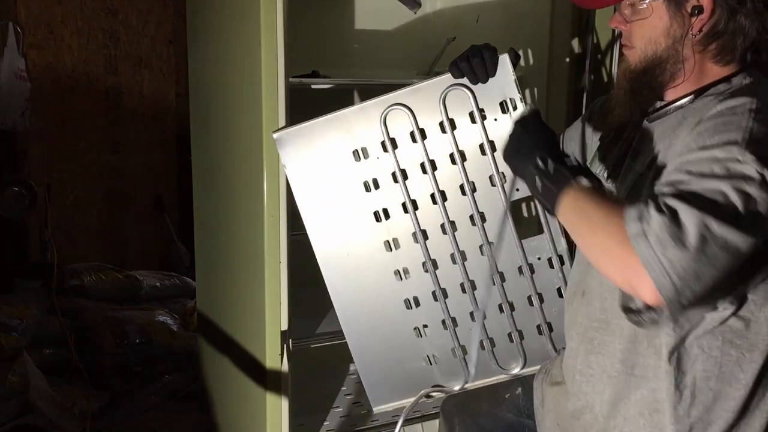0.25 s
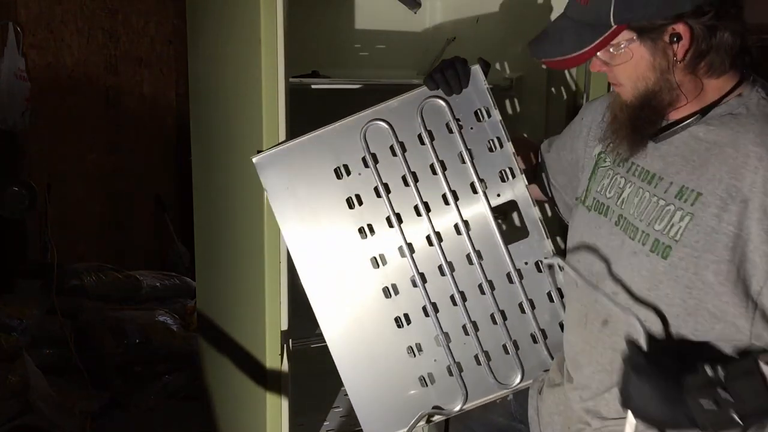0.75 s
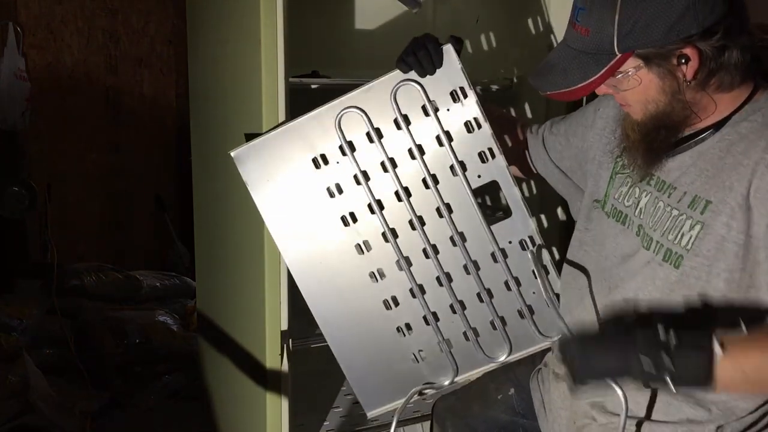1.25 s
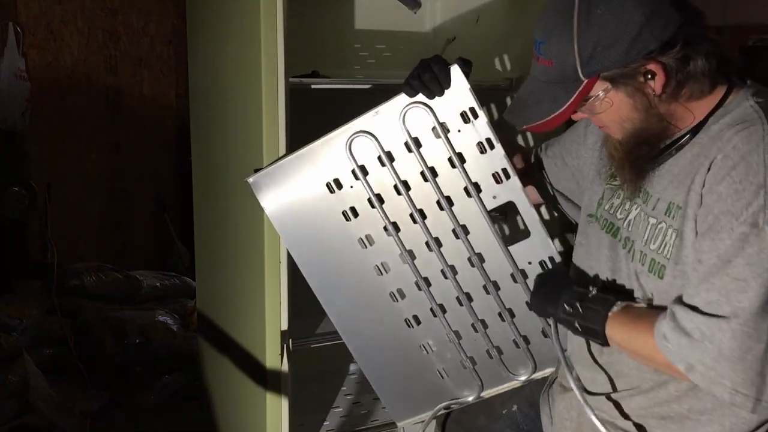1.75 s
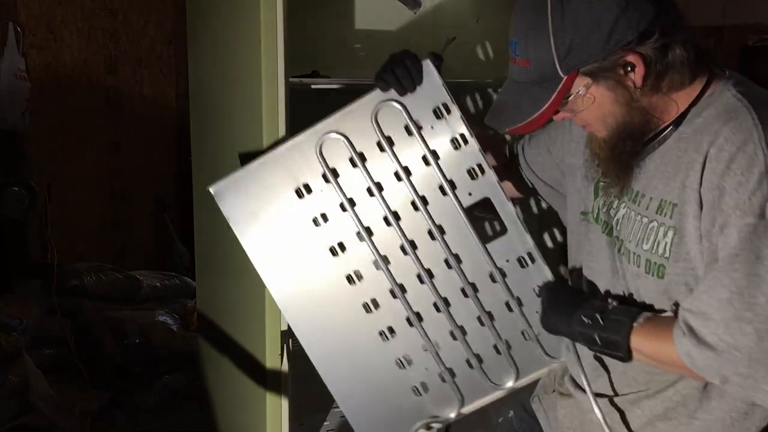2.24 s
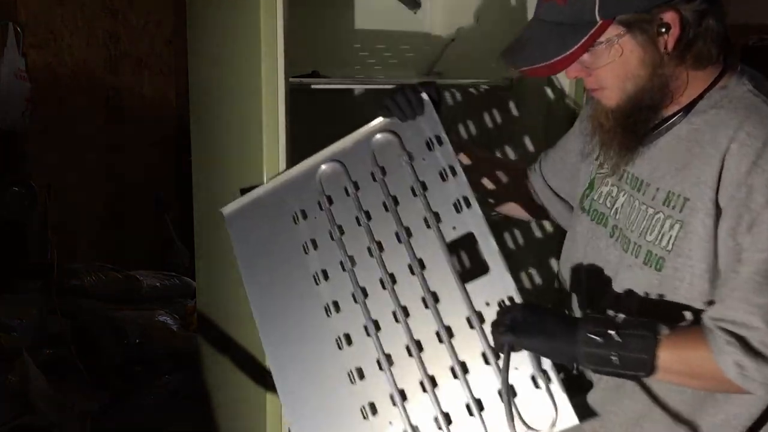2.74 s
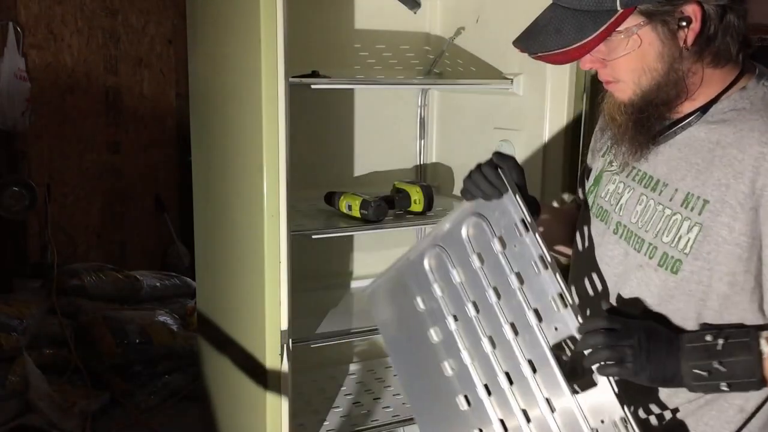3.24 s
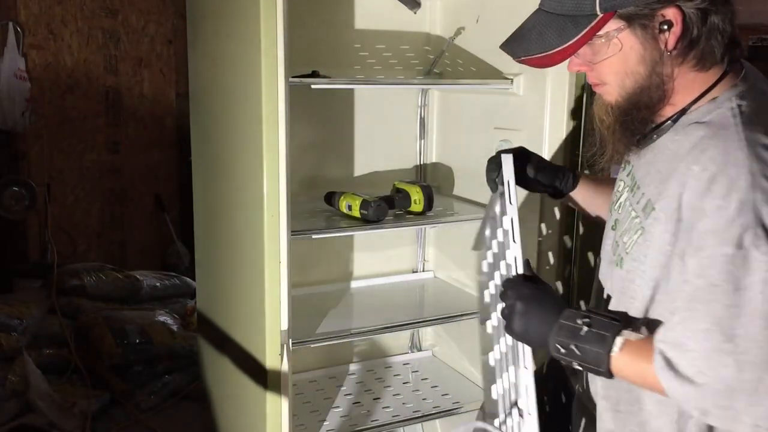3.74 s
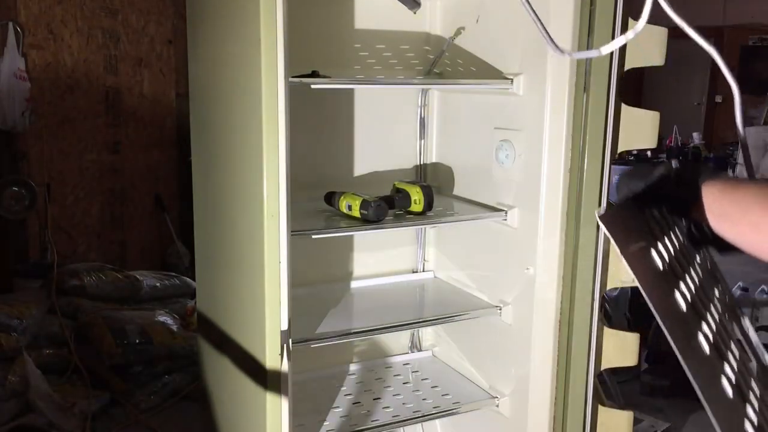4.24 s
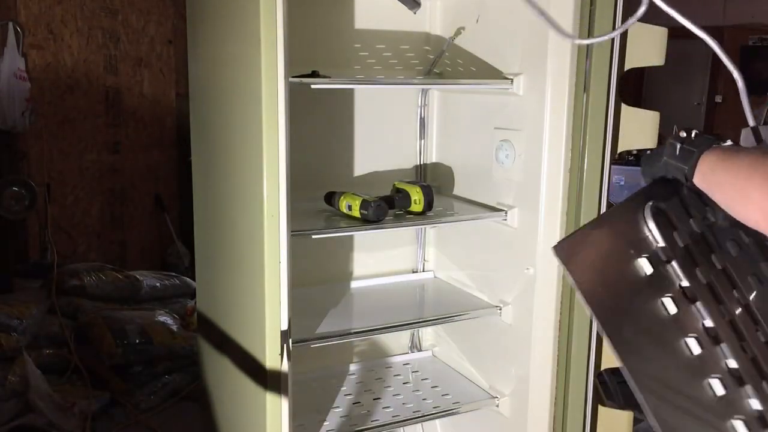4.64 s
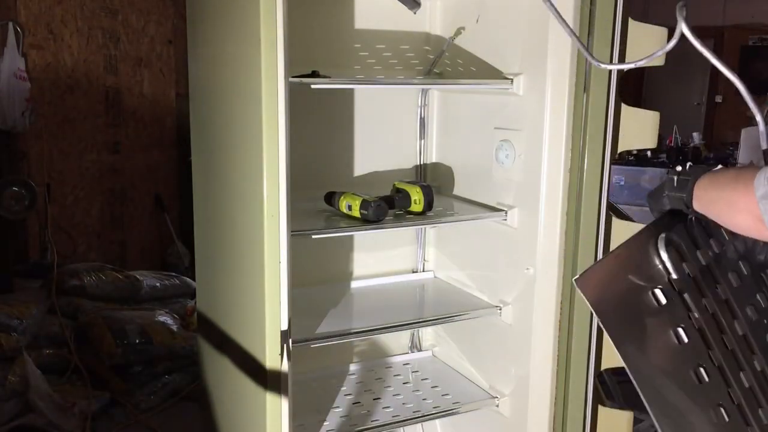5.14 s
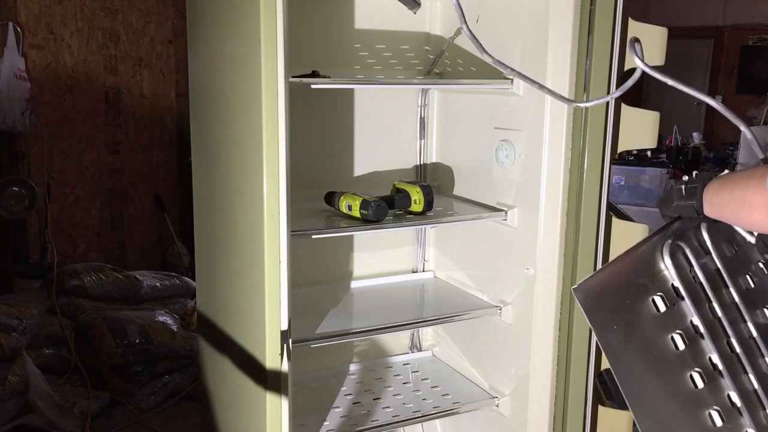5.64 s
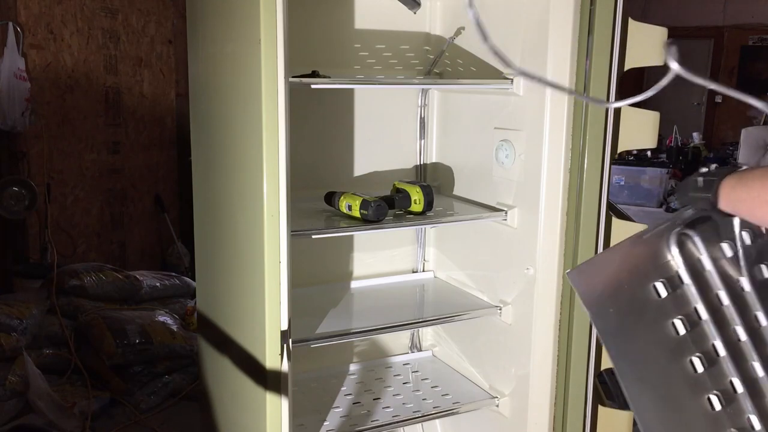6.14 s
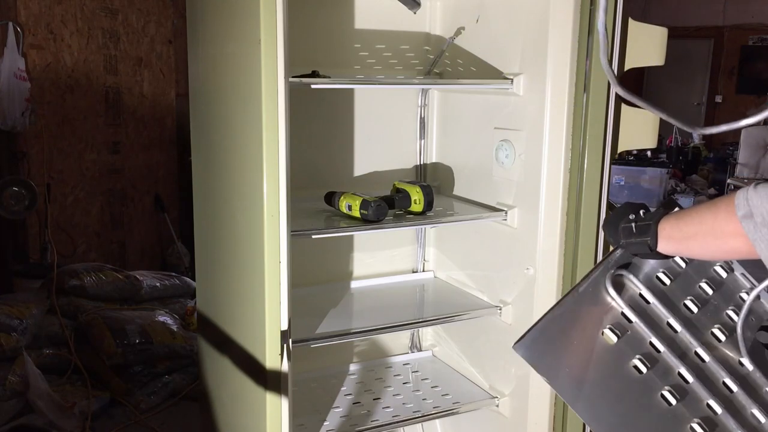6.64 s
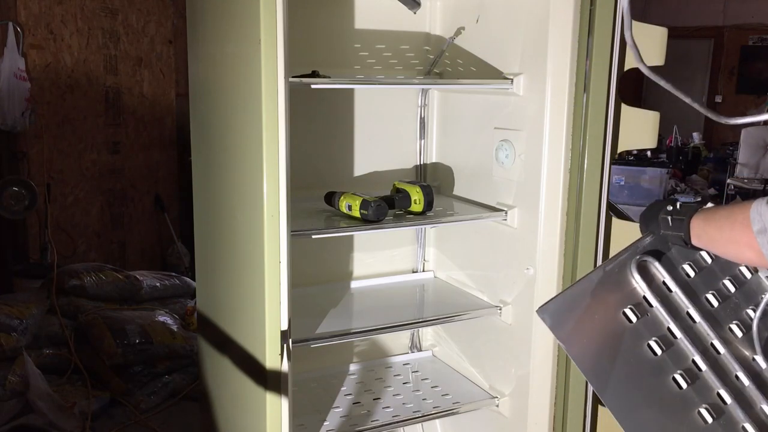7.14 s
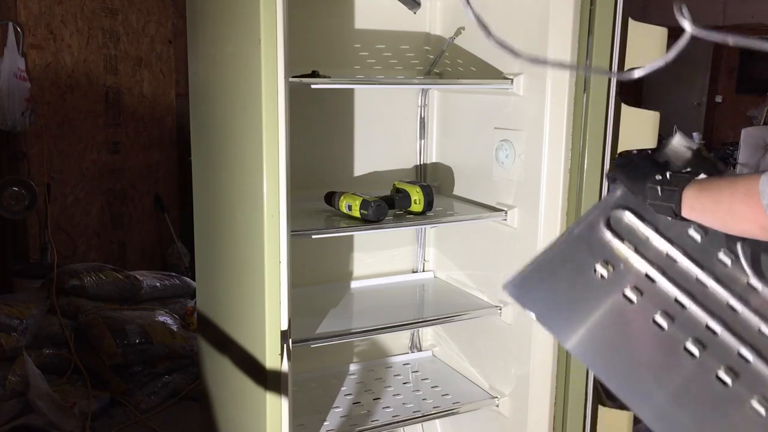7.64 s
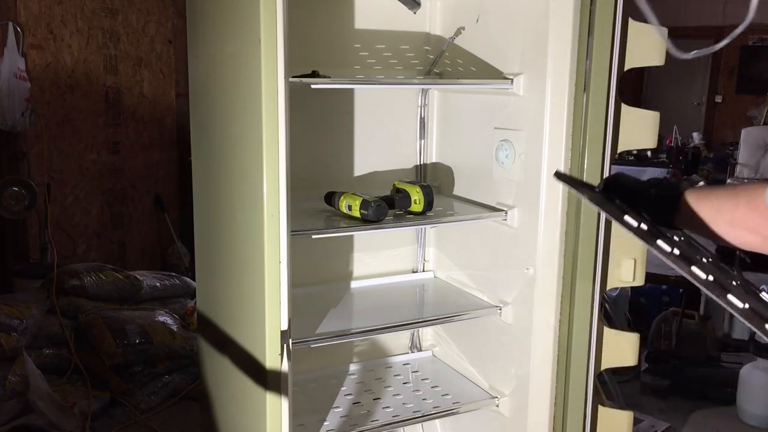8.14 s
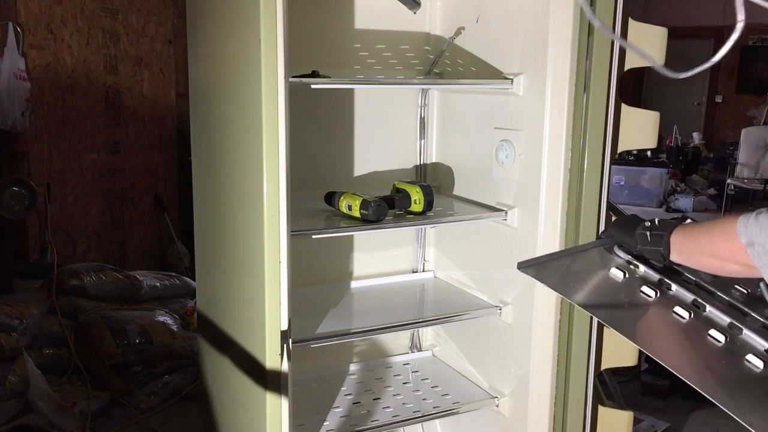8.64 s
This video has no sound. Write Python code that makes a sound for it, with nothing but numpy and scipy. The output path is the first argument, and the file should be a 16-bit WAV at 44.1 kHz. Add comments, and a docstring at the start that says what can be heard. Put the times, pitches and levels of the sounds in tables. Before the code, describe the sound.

Close, single-microphone sound in a small reverberant workshop with a low murmur. A short rub of glove and tube on thin perforated sheet metal leads to a clattering release at 0.25-0.55 s, loudest near 0.5 s, with hollow booming, tinny ringing and a high tube ping. Scraping continues, with a knock at 0.88 s, a soft dull touch near 1.25, and clanks at 1.7 and 2.0. Two hard, bright cracks ring the sheet at 2.68 and 2.97 s. It then quiets to faint rustles and ticks. At about 3.9 s a steady, airy mid-range hum switches on and stays. Gritty glove strokes and light taps follow around 4.2-4.7, a double clunk at 5.36, a cluster of hollow knocks at 6.25-6.33 and another at 6.6. Hissing rubs around 7-8 s precede softer knocks at 8.13 and 8.83.

```python
"""A short rub of glove and tube over a thin perforated sheet comes first, above a low room murmur.
Then, in a small workshop, gloved hands pull the metal tube out of the sheet's clips: each clip lets go
with a snap or knock, a noise burst that rings the sheet's modes. Grainy noise makes the sliding between
them, and filtered noise the murmur and a steady airy hum that sets in partway. One microphone channel
takes the near sound, the workshop's reverberation and the background."""
import sys
import numpy as np
from scipy import signal
from scipy.fft import rfft, irfft
from scipy.io import wavfile

SR = 44100
rng = np.random.default_rng(int(sys.argv[2]) if len(sys.argv) > 2 else 0)


def bounce(signal):
    """Save signal as a 16-bit WAV file at the path given by the first command-line argument."""
    frames = np.transpose(np.atleast_2d(signal))
    limited = np.clip(frames, -1, 1)
    pcm = np.round(limited * 32767).astype(np.int16)
    wavfile.write(sys.argv[1], SR, pcm)


def invert_db(x):
    """Field ratio 10**(x/20) for x, a level in decibels (scalar or array-like)."""
    u = np.asarray(x, float) / 20
    return 10 ** u


N = 391608

# spectrum of the room murmur: pitch_hz, relative level_db per Hz
MURMUR_SPECTRUM = [(24, -49), (40, -8), (140, 4.5), (312, -3.5), (467, -4.5), (873, -9.5), (1040, -6.5),
                   (2380, -14.5), (4930, -16.5), (12800, -20), (16000, -25)]
MURMUR_DB = -69.5
# spectrum of the airy hum: pitch_hz, relative level_db per Hz
HUM_SPECTRUM = [(300, -24), (500, -7.5), (800, 0.5), (1000, 3), (1450, -3.5), (1900, -17), (3000, -39)]
# level of the airy hum over time: time_s, level_db
HUM_LEVEL = [(0, -95.5), (3.9, -91), (3.93, -71), (6.2, -69), (8.88, -75)]
# workshop reverberation: pitch_hz, level_db, t60_s
ROOM = [(115.5, -5.5, .6), (360, -9.5, 0.63), (950, -9.5, 0.082), (2160, -14, 0.64), (4100, -12, 0.83),
        (7900, -10.5, 0.68), (16000, -14.5, 0.71)]
# edges of the third-octave bands that store dense ringing: pitch_hz
BAND_EDGES = 60 * 2 ** np.arange(0, 8.4, 1 / 3)
# spectrum of the glove's hiss: pitch_hz, relative level_db per Hz
GLOVE_SPECTRUM = [(300, -31.5), (1500, -3), (3000, 1), (5000, 3.5), (9000, 0.5), (13000, 1), (16000, -7.5)]
# strokes of glove and tube over the sheet: start_s, length_s, hiss_db, relative drag_db
STROKES = [(0, 0.067, -75.5, -70.5), (0.13, 0.013, -70.5, -64), (0.25, 0.72, -65, -56.5),
           (1.184, 0.093, -71.5, -58), (1.288, 0.059, -61.5, -64.5), (1.41, 0.02, -64, -65),
           (1.512, 0.042, -65.5, -63), (1.666, .02, -69, -67), (1.721, 0.19, -70, -63),
           (2.177, 0.094, -79.5, -61), (2.31, 0.12, -65.5, -59.5), (2.47, 0.14, -69, -65.5),
           (3.476, 0.061, -69.5, -75), (3.563, 0.045, -85, -64), (3.656, 0.051, -75.5, -73.5),
           (3.784, 0.091, -72.5, -82), (3.947, 0.029, -64.5, -67), (4.055, 0.014, -68.5, -76),
           (4.132, 0.01, -64.5, -59.5), (4.202, 0.086, -63.5, -57.5), (4.541, .11, -62, -65),
           (4.68, 0.12, -59.5, -64.5), (4.907, 0.071, -67, -62), (5.099, 0.11, -76.5, -79),
           (5.26, 0.11, -83.5, -69.5), (6.19, 0.081, -75.5, -66.5), (6.954, 0.06, -57.5, -60.5),
           (7.097, 0.046, -64, -69), (7.409, 0.046, -65, -73), (7.519, 0.022, -56, -59),
           (7.592, 0.14, -59.5, -56), (7.811, 0.058, -55, -61), (7.94, .04, -65.5, -62.5),
           (8.05, 0.046, -66.5, -63), (8.12, 0.083, -63, -57), (8.33, 0.15, -69, -79),
           (8.526, .13, -73.5, -69.5), (8.708, 0.018, -75, -63.5), (8.72, 0.043, -92, -58.5)]
STROKE_RISE_DB_PER_S, STROKE_FALL_DB_PER_S, STROKE_FLUTTER_DB = 600, 300.5, 0.5
# the tube strains against a clip until it lets go: release_s, hiss_db, relative drag_db
STRAINS = [(.255, -63, -50.5), (0.871, -70, -58), (1.985, -61.5, -48.5), (2.674, -67, -52.5),
           (5.355, -75, -59.5), (6.612, -60.5, -48.5), (8.123, -54.5, -63), (8.83, -66.5, -63)]
STRAIN_RISE_DB_PER_S, STRAIN_FALL_DB_PER_S = 251, 2501.5
AT_REST_HISS_DB, AT_REST_DRAG_DB = -86.5, -76  # the drag is relative, as in the two tables
# the sheet's ringing mode near 560 Hz, kept humming by the drag: pitch_hz, level_db, t60_s
DRAG_HUM = [(561.4, -33, 0.13)]
# how the hands hold the sheet: time_s, freedom of the lowest lingering mode_db, freedom of the others_db, #
# bending as change of pitch_percent, thud_db, lean of the others_db per octave
HOLD = [(0.27, 0.5, 1.5, 5.5, -6.5, 6), (0.399, 6.5, 1, -0.6, 3, 3), (0.52, 3, -16, 4, 0.3, 0.1),
        (0.9, -0.5, -2, 0.9, 4, 3), (1.25, 2, 12, 0.5, -2, 0.1), (1.7, 0.7, -2.5, 3.5, 0.1, 0.1),
        (2.02, -0.1, -1.7, -1.5, -1, -3), (2.679, -2.5, 0.5, -5.6, -2, 13.5),
        (2.971, -3.5, 2.5, -0.2, -4, -0.5), (5.36, -13, -8, 0.5, 0.7, -2.5),
        (6.33, -7, -8.5, -3.5, 0.5, -5), (6.62, -3, -12, 4.5, 1.5, -3), (8.129, -16, -3, -1.5, 1.5, 0.5),
        (8.799, -9, -2.5, 3.0, 0.5, 4)]
# the sheet's clearest modes: pitch_hz, level_db, t60_s
SHEET = [(175, -56.5, 0.23), (214.4, -47, 0.33), (440, -54, 0.05), (540, -48, 0.03), (784, -44, 0.067),
         (1025, -46, 0.18), (1210, -46, 0.04), (1548, -42.5, 0.11), (1796, -42, 0.087), (2046, -40, 0.14),
         (2180, -39.5, 0.099), (2450, -47.5, 0.053), (3860, -44.5, 0.1), (4130, -43.5, 0.16),
         (6700, -50.5, 0.071)]
# the crowd of weaker sheet modes: pitch_hz, level_db, t60_s
CROWD = [(120, -7.5, 0.15), (292, 3.5, 0.11), (690, 1.5, 0.2), (1430, 5.5, 0.11), (3220, 2, 0.13),
         (5670, 0, 0.07), (10300, -4, 0.078), (16440, -9.5, 0.19)]
# modes that linger after a blow: pitch_hz, level_db over the blow's level at that pitch, t60_s
LINGERING = [(571, 2.5, 0.18), (780, -13, 0.36), (1203, -8.5, .25), (1652, -2, 0.2), (1780, -4, 0.11),
             (2190, -4, 0.079)]
# the tube's ping and its long after-ring: pitch_hz, level_db, t60_s
TUBE = [(5540, 0, .09), (5545, -15, .75)]
# taps on the tube: start_s, level_db
TUBE_TAPS = [(0.5, -35), (0.886, -42), (3.638, -66), (5.362, -45), (8.412, -61)]
# blows on the sheet, levels relative: start_s, boom_db, clank_db, crack_db, contact_ms
BLOWS = [(0.255, -70, -55, -56.5, 5.8), (0.264, -34.5, -33, -40.5, 2.6), (0.288, -41, -47.5, -51.5, 3.8),
         (0.368, -42, -36.5, -42.5, 5.5), (0.393, -38, -41, -39.5, 3.4), (0.408, -54, -48, -62, 1.3),
         (0.498, -29.5, -27, -24, 3.7), (0.5347, -34.5, -27, -24.5, 3), (0.541, -40, -38, -34.5, 2.9),
         (0.876, -44, -39.5, -40, 5.7), (0.886, -37.5, -37, -37, 1.8), (1.232, -50.5, -72, -62.5, 26),
         (1.258, -63, -66, -65, 5.3), (1.695, -45.5, -43.5, -39, 8.5), (1.988, -40, -49, -50.5, 4.1),
         (2.004, -39.5, -35.5, -42, 6.1), (2.042, -42.5, -39, -33.5, 3.8), (2.332, -61, -61, -60, 9),
         (2.6836, -33.5, -26, -20.5, 1.1), (2.9685, -37, -25.5, -19.5, 0.42),
         (3.637, -69.5, -78, -64.5, 2.2), (3.71, -76.5, -78, -69.5, 2.6), (3.917, -71, -69, -70.5, 2.5),
         (4.203, -66, -57.5, -49.5, 8.3), (4.495, -75, -66.5, -62, 1.7), (4.559, -56, -62.5, -70, 3),
         (5.114, -70.5, -64.5, -62.5, 4.1), (5.358, -38, -38.5, -37, 4.9), (5.388, -46, -41.5, -38, 3.1),
         (6.254, -40, -33.5, -36.5, 3.9), (6.322, -32.5, -38, -45.5, 5.9), (6.332, -38.5, -36.5, -37, 1.4),
         (6.508, -58, -72, -72, 2.2), (6.617, -41.5, -42, -41, 6.2), (6.955, -70, -61, -57.5, 6.4),
         (7.018, -70.5, -61, -54.5, 3.1), (7.081, -57.5, -57, -62, 6.4), (7.2, -73, -85, -70.5, 2.8),
         (7.498, -73, -66, -61.5, 3), (7.669, -53.5, -55.5, -73, 4), (8.127, -42, -48.5, -51, 8.7),
         (8.415, -76.5, -72, -59, 5.9), (8.554, -75, -75.5, -63.5, 2.6), (8.6, -74, -67, -58.5, 2.7),
         (8.822, -45, -46, -49.5, 7.1), (8.834, -58, -43.5, -44, 2.9)]
# thud, boom, clank, crack and fizz of a contact: low_hz, high_hz
CONTACT_BANDS = [(150, 330), (430, 850), (950, 3500), (3500, 9000), (9000, 17000)]
THUD_BELOW_BOOM_DB, THUD_FOLLOWS_CRACK = 11.5, 0.29  # a hard blow also moves the whole sheet


def rms_one(x):
    """Scale to an rms of 1."""
    return x / np.sqrt(np.mean(x ** 2) + 1e-20)


def in_time(rows):
    """Table columns as curves, one value a sample."""
    s, *columns = np.transpose(rows)
    return [np.interp(np.arange(N) / SR, s, c) for c in columns]


def at_hz(rows, hz):
    """Table columns read on a log-frequency axis."""
    f, *columns = np.transpose(rows)
    return [np.interp(np.log(hz), np.log(f), c) for c in columns]


def band(x, low_hz, high_hz):
    """Butterworth band-pass."""
    edges = [low_hz, min(high_hz, .45 * SR)]
    return signal.sosfilt(signal.butter(2, edges, "band", fs=SR, output="sos"), x)


def coloured(x, spectrum):
    """Shape a steady noise to a spectrum; rms 1."""
    hz = np.maximum(np.arange(len(x) // 2 + 1) * SR / len(x), 10)
    return rms_one(irfft(rfft(x) * invert_db(at_hz(spectrum, hz)[0]), len(x)))


def lumpy(x, width_hz, depth_db):
    """Give noise a fine, uneven row of resonance peaks."""
    hz = np.arange(N // 2 + 1) * SR / N
    heights = np.minimum(rng.exponential(1, 4000), 2.5)
    peaks = np.interp(hz / width_hz, np.arange(4000), heights)
    return irfft(rfft(x) * invert_db(depth_db * peaks), N)


def drift(rate_hz):
    """Slow chance: noise through a double one-pole low-pass, run in for a second; rms 1."""
    r = np.exp(-2 * np.pi * rate_hz / SR)
    return rms_one(signal.lfilter([1], [1, -2 * r, r * r], rng.standard_normal(N + SR))[SR:])


def ring(x, modes):
    """Sum of damped resonances; a unit click starts each at its table height."""
    out = 0
    for hz, level_db, t60 in modes:
        r = invert_db(-60 / (t60 * SR))
        w = 2 * np.pi * hz / SR
        mode = signal.lfilter([0, np.sin(w)], [1, -2 * r * np.cos(w), r * r], x + 1e-18)
        out = out + invert_db(level_db) * mode
    return out


def clusters(rows):
    """Damped tones that swell in over a few ms; each is three close modes that beat unevenly."""
    out = np.zeros(N + 2 * SR)
    for (s, hz, level_db, t60), (split, turn) in zip(rows, rng.random((len(rows), 2))):
        t = np.arange(int(min(t60, 2) * SR)) / SR
        apart_hz = (12 + .002 * hz) * np.array([[0], [.6 + split], [-1.3 + .5 * turn]])
        cycles = (hz + apart_hz) * t + [[0], [turn], [split]]
        trio = [1, .6, .5] @ np.sin(2 * np.pi * cycles)
        swell = 1 - np.exp(-t / 0.0027)
        out[round(s * SR):][:len(t)] += invert_db(level_db - 60 * t / t60) * swell * trio
    return out[:N]


def wash(power_in, table, width_hz, depth_db):
    """Modes too dense to tell apart: each band stores its power and sheds it as dying noise."""
    out = 0
    white = lumpy(rng.standard_normal((2, N)), width_hz, depth_db)
    for k, (low, high) in enumerate(zip(BAND_EDGES, BAND_EDGES[1:])):
        level_db, t60 = at_hz(table, np.sqrt(low * high))
        keep = invert_db(-120 / (t60 * SR))  # a power, so twice the decibels
        stored = signal.lfilter([1 - keep], [1, -keep], power_in(low, high) + 1e-18)
        # neighbouring bands take different noises
        out = out + invert_db(level_db) * np.sqrt(stored) * rms_one(band(white[k % 2], low, high))
    return out


def room_murmur():
    """Low murmur of the room: steady noise of a fixed spectrum."""
    return invert_db(MURMUR_DB) * coloured(rng.standard_normal(N), MURMUR_SPECTRUM)


def airy_hum():
    """Airy hum that switches on: noise with fine resonance peaks in a middle band."""
    air = lumpy(rng.standard_normal(N), width_hz=13, depth_db=1.5)
    return invert_db(in_time(HUM_LEVEL)[0]) * coloured(air, HUM_SPECTRUM)


def reverberation(near):
    """The workshop stores the power of the near sound band by band and gives it back as dying noise."""
    def power_in(low, high):
        return band(near, low, high) ** 2
    return wash(power_in, ROOM, width_hz=31, depth_db=3.0)


def held(s):
    """The grip at a moment: freedom of the lowest lingering mode and the others, bending, thud, lean."""
    times, *columns = np.transpose(HOLD)
    return [np.interp(s, times, c) for c in columns]


def pressure_db():
    """Hiss and drag levels: each stroke rises, holds and falls; each strain swells and stops short."""
    t = np.arange(N) / SR
    power = invert_db([[AT_REST_HISS_DB], [AT_REST_DRAG_DB]]) ** 2 * np.ones(N)
    rows = [(s, s + length, db, STROKE_RISE_DB_PER_S, STROKE_FALL_DB_PER_S)
            for s, length, *db in STROKES]
    rows += [(s, s, db, STRAIN_RISE_DB_PER_S, STRAIN_FALL_DB_PER_S) for s, *db in STRAINS]
    for start, end, db, rise, fall in rows:
        near = slice(max(int((start - .3) * SR), 0), int((end + .3) * SR))
        shape_db = -rise * np.maximum(start - t[near], 0) - fall * np.maximum(t[near] - end, 0)
        power[:, near] += invert_db(np.array(db)[:, None] + shape_db) ** 2
    flutter_db = STROKE_FLUTTER_DB * np.array([drift(10.0), drift(15.0)])
    shared_flutter_db = 1.2 * drift(60.0)
    return 10 * np.log10(power) + flutter_db + shared_flutter_db


def sliding():
    """Fabric hisses in fine grains; the dragged tube feeds coarser grains into the sheet."""
    hiss_db, drag_db = pressure_db()
    fine = rng.standard_normal(N) * invert_db(1.4 * rng.exponential(1, N))
    grit = 5.0 * rng.standard_normal(N) * (rng.random(N) < 150 / SR)  # catches on the holes
    fine = lumpy(fine + grit, width_hz=120, depth_db=1.2)
    coarse = rng.standard_normal(N) * (rng.random(N) < 2500 / SR)
    hiss = invert_db(hiss_db) * coloured(fine, GLOVE_SPECTRUM)
    drag = invert_db(drag_db - 8.5) * rms_one(band(coarse, 230, 3300))
    return hiss, drag


def drag_hum(drag):
    """The drag keeps the sheet's mode near 560 Hz humming, as far as the grip leaves the lowest lingering mode
    free."""
    freedom_db = held(np.arange(N) / SR)[0]
    return ring(drag * invert_db(freedom_db), DRAG_HUM)


def crowd(power, drag):
    """The dense modes take a share of each contact band; narrow low bands fill slowly."""
    def power_in(low, high):
        hz = np.sqrt(low * high)
        share = [(high - low) / (b - a) / (1 + ((hz * hz - a * b) / (hz * (b - a))) ** 4)
                 for a, b in CONTACT_BANDS]
        slow = np.exp(-3.0 * (high - low) / SR)
        filled = signal.lfilter([1 - slow], [1, -slow], share @ power)
        return filled + band(drag, low, high) ** 2
    return wash(power_in, CROWD, width_hz=60, depth_db=4.5)


def tones():
    """Every blow wakes the lingering modes, each with a chance strength; taps on the tube ping."""
    luck_db = 1.5 * rng.standard_normal((len(BLOWS), len(LINGERING)))
    rows = []
    for (s, boom_db, clank_db, *_), luck_row in zip(BLOWS, luck_db):
        lowest_free_db, others_free_db, bend_percent, _, lean_db = held(s)
        for k, ((hz, level_db, t60), luck) in enumerate(zip(LINGERING, luck_row)):
            if k == 0:
                blow_db = boom_db + lowest_free_db
            else:
                octaves = np.log2(hz / LINGERING[3][0])
                blow_db = clank_db + others_free_db + lean_db * octaves
            rows.append((s, hz * (1 + bend_percent / 100), level_db + luck + blow_db, t60))
    for s, tap_db in TUBE_TAPS:
        rows += [(s, hz, tap_db + level_db, t60) for hz, level_db, t60 in TUBE]
    return clusters(rows)


def blow_levels_db(s, boom, clank, crack):
    """Levels of thud, boom, clank, crack and fizz; freely ringing modes draw on boom and clank."""
    lowest_free_db, others_free_db, _, thud_db, _ = held(s)
    thud = boom + thud_db - THUD_BELOW_BOOM_DB + THUD_FOLLOWS_CRACK * (crack - boom)
    # a dull blow keeps falling towards the top
    fizz = crack - 3.0 + 0.65 * (crack - clank) + 0.25 * min(crack - boom, 0)
    boom = boom - .8 * max(lowest_free_db + 2, 0)
    clank = clank - .8 * max(others_free_db + 2, 0)
    return [thud, boom, clank, crack, fizz]


def blows():
    """Each contact is a burst of uneven slips that swells and dies; returns force and band powers."""
    length = 4096
    t = np.arange(length) / SR
    size = (len(BLOWS), length)
    slips = rng.standard_normal(size) * invert_db(2.2 * rng.exponential(1, size))
    force, power = np.zeros(N + length), np.zeros((5, N + length))
    for (s, boom_db, clank_db, crack_db, contact_ms), burst in zip(BLOWS, slips):
        start = round(s * SR)
        life = np.clip(contact_ms, .2, 30) / 1000
        shape = (1 - np.exp(-t / (0.8 * life))) * np.exp(-t / life)
        # energy of 12.5 ms at the given level
        energy = invert_db(blow_levels_db(s, boom_db, clank_db, crack_db)) ** 2 * .0125 * SR
        power[:, start:][:, :length] += energy[:, None] * shape ** 2 / np.sum(shape ** 2)
        burst = burst * shape
        # a short contact opens with one clean click
        burst[0] = 2.0 * np.sqrt(np.sum(burst ** 2)) * min(1, 0.00051 / life) ** 2
        for share, (low, high) in zip(energy, CONTACT_BANDS):
            part = band(burst, low, high)
            force[start:][:length] += part * np.sqrt(share / np.sum(part ** 2))
    return force[:N], power[:, :N]


def scene():
    """Blows and drag ring the sheet, the room answers."""
    hiss, drag = sliding()
    force, power = blows()
    direct = invert_db(-4.5) * (force + drag)
    sheet = ring(force + drag, SHEET) + crowd(power, drag) + drag_hum(drag)
    near = direct + sheet + tones() + hiss
    background = room_murmur() + airy_hum()
    return (near + reverberation(near) + background)[None]


def low_pass(x):
    """Removes everything above the highest recorded frequency."""
    return signal.sosfilt(signal.butter(12, 16680, fs=SR, output="sos"), x)


def record(dry):
    """The microphone drops the deep bass and the extreme top."""
    mix = signal.sosfilt(signal.butter(2, 90, "high", fs=SR, output="sos"), dry)
    mix = signal.sosfilt(signal.cheby2(10, 40, 16800, fs=SR, output="sos"), mix)
    return low_pass(mix)


dry = scene()
out = record(dry)
bounce(out)
```